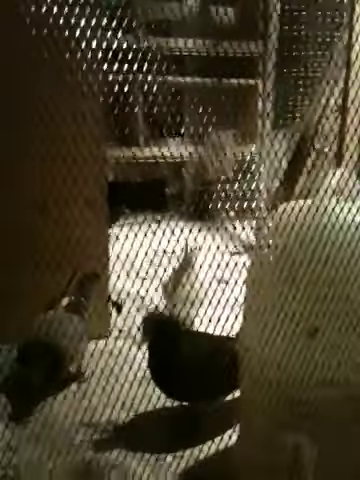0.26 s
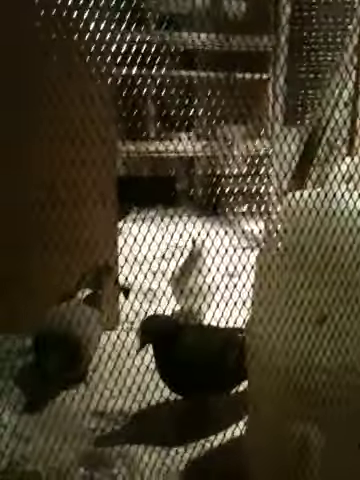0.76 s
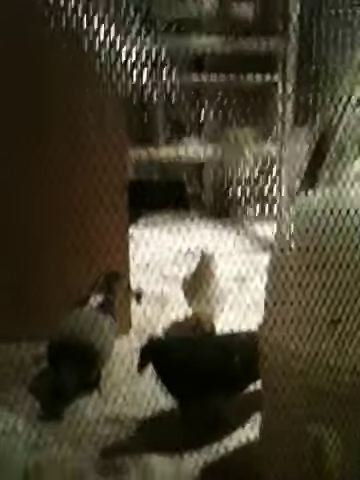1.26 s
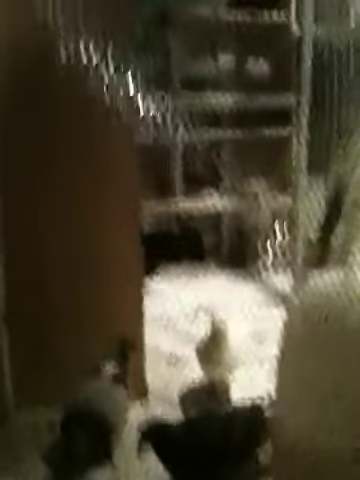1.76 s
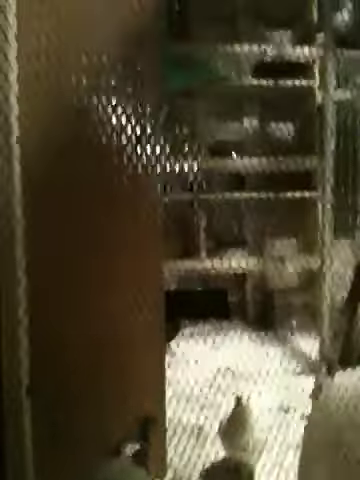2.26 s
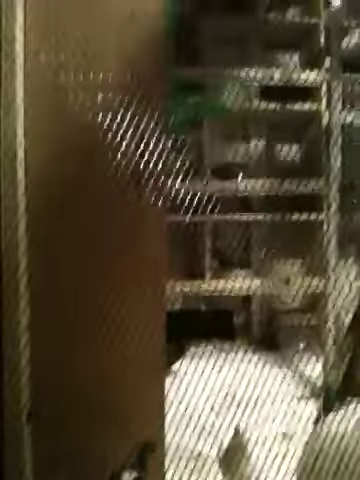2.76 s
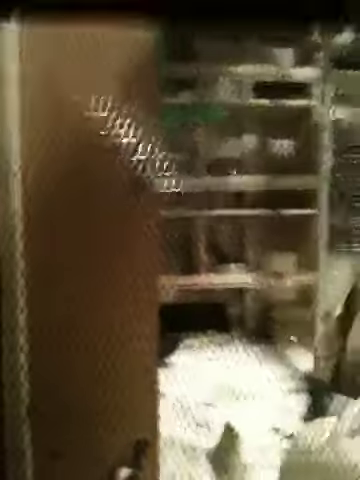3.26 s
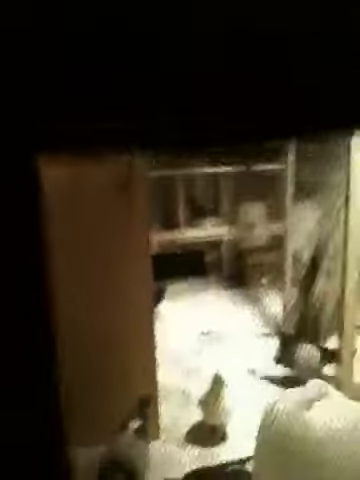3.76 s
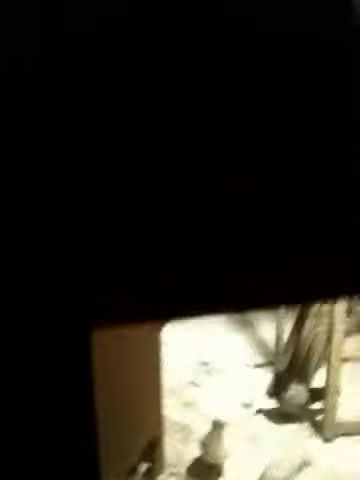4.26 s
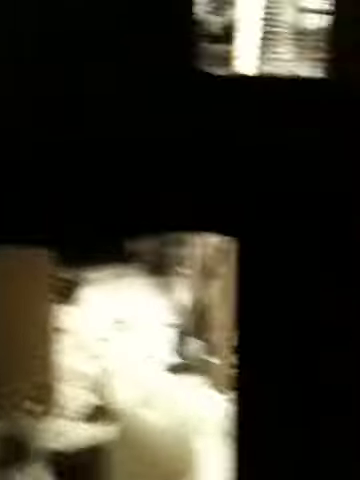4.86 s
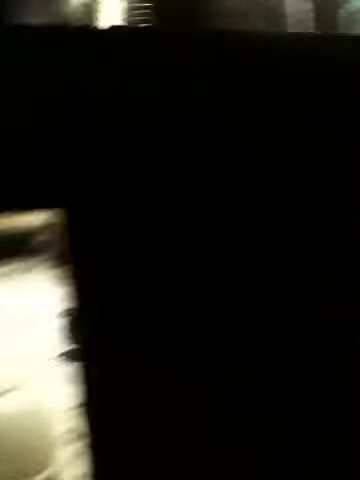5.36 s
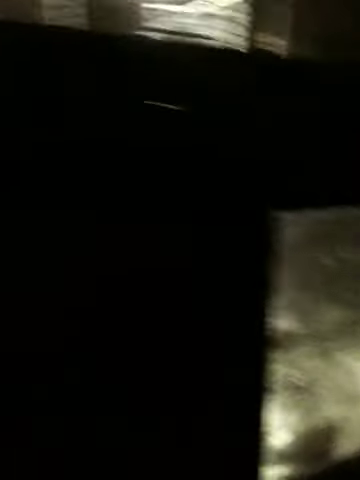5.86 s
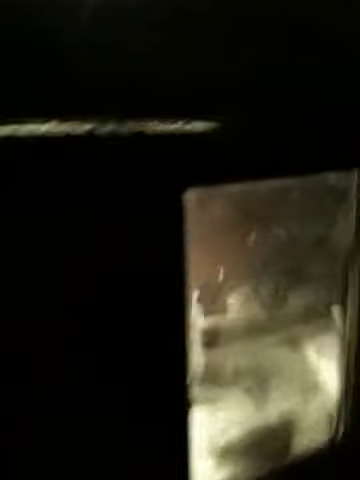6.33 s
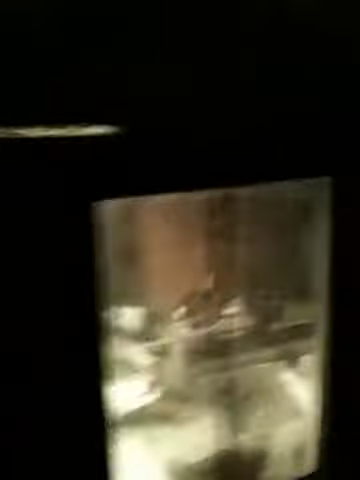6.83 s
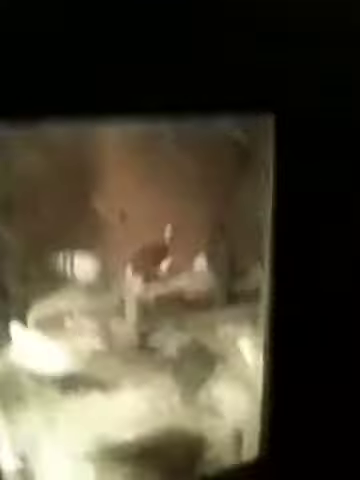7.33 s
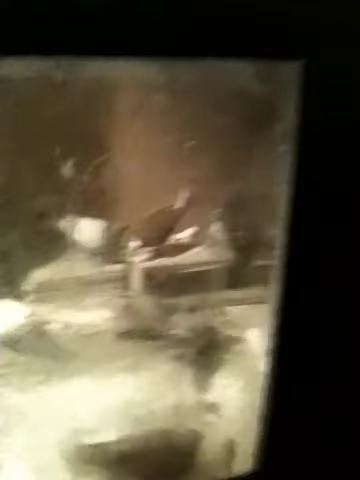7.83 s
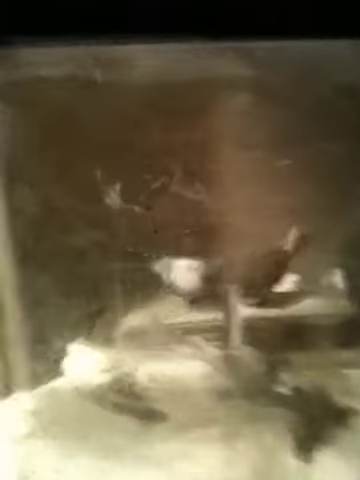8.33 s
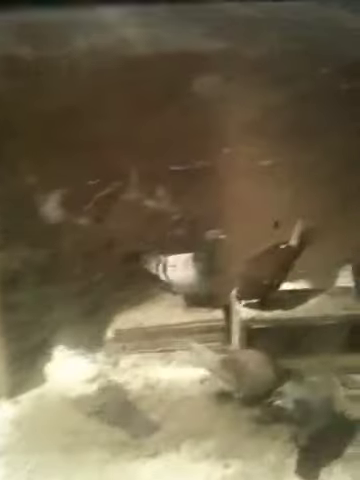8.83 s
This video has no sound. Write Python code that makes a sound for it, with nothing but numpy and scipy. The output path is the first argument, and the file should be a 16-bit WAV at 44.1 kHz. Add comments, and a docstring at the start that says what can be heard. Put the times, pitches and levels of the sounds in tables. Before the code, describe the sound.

Inside a small wooden loft, many pigeons coo in low, rolling, overlapping voices, with more birds murmuring behind. Faint hiss and light shuffling lie underneath. Around the middle a metal latch rattles and snaps shut loudly close by. Afterwards feathers and litter rustle more, claws tap on wood, and the coos become denser. A small handheld microphone gives a thin sound with little bass.

```python
"""Pigeons in a small wooden loft: from the start, noise bands hiss, blurred tones whistle thinly,
many short throbs blur into a murmur of far birds, and filtered noise shuffles like feathers and litter.
Soon gliding tones coo, short swelling tones throb, rustles burst and dry noise snaps tick.
Later, claws and beaks tap ringing boards, a metal latch ticks and snaps shut close by, and the
microphone case is softly bumped. The small microphone cuts the bass and the top."""
import sys
import numpy as np
from scipy import signal
from scipy.io import wavfile
from scipy.ndimage import uniform_filter1d

SR = 44100
rng = np.random.default_rng(int(sys.argv[2]) if len(sys.argv) > 2 else 0)


def transcribe(u):
    """Save the signal u as a 16-bit wav file named by the first command-line argument.

    u: samples, shape (n,) or (channels, n), limited to [-1, 1]; the rate is SR.
    q: integer samples, one column per channel.
    """
    v = np.clip(np.atleast_2d(u).T, -1, 1)
    q = np.round(v * 32767).astype(np.int16)
    wavfile.write(sys.argv[1], SR, q)


N = 400869  # samples, about 9.1 s

# rustles of feathers and litter: (start_s, level_db, dullness_db: tilt towards the lows)
RUSTLE_EVENTS = [(0.455, -72, 5.5), (0.652, -63.5, -3.5), (1.451, -77.5, -4.5), (2.858, -74.5, 13),
                 (3.013, -70, 6), (3.032, -79, 12), (3.396, -90.5, 26), (3.829, -58.5, -0.5),
                 (3.898, -68.5, 13), (5.383, -70, 4), (5.746, -73.5, -4.5), (5.794, -71, 4.5),
                 (6.086, -64, -0.5), (6.135, -63.5, -5.5), (6.181, -67.5, -8.5), (6.215, -65.5, 0.5),
                 (6.242, -66, -7), (6.553, -64.5, 0), (6.595, -74.5, -7), (6.69, -66.5, -6),
                 (6.732, -67.5, -4.5), (6.862, -78.5, 14), (6.909, -77, 8), (7.351, -57.5, -3.5),
                 (7.392, -70.5, 14), (7.42, -56, -2.5), (7.518, -62.5, -2), (7.546, -66.5, 3),
                 (7.609, -58.5, -1), (7.878, -62.5, 4), (8.1, -64, 3), (8.163, -64.5, 5),
                 (8.355, -63.5, 1.5), (8.62, -62, 7.5), (8.916, -61.5, 8.5), (8.947, -70.5, -1)]
# how rustles spread over pitch: (low_edge_hz, share of dullness [factor], level_db)
RUSTLE_COLOURS = [(123, 1, -6.5), (553, 1, -1), (1200, 0.85, -2), (2730, 0.56, -1.5), (4430, -0.88, 1),
                  (7240, -0.74, -5)]


def amp(db):
    """Turns decibels into a plain loudness factor."""
    return 10 ** (np.asarray(db) / 20)


def rms_one(x):
    """Scales a sound to an average strength (rms) of 1."""
    return x / np.sqrt(np.mean(x ** 2) + 1e-20)


def at_hz(points, hz):
    """Reads a curve of (hz, value) points, with pitch on a logarithmic scale as we hear it."""
    points = np.array(points)
    return np.interp(np.log(hz), np.log(points[:, 0]), points[:, 1])


def at_time(points):
    """Draws a curve of (time_s, value) points over the whole scene."""
    return np.interp(np.arange(N) / SR, *np.transpose(points))


def band(x, low_hz, high_hz):
    """Keeps mostly what lies between two pitches."""
    return signal.sosfilt(signal.butter(2, [low_hz, high_hz], "band", fs=SR, output="sos"), x)


def drift(rate_hz):
    """Wanders at random around 0 with spread 1: smoothed noise, made at every 40th sample."""
    r = np.exp(-80 * np.pi * rate_hz / SR)
    noise = rng.standard_normal(N // 40 + 2002)
    slow = signal.lfilter([1], [1, -2 * r, r * r], noise)[2000:]  # skip the filter's start
    return np.interp(np.arange(N) / 40, np.arange(len(slow)), rms_one(slow))


def add(out, start_s, sound):
    """Mixes a short sound in at its start time."""
    i = max(round(start_s * SR), 0)
    out[i:i + len(sound)] += sound[:max(N - i, 0)]


def click_train(events):
    """Silence with one single-sample click per event (start_s, level_db, ...)."""
    clicks = np.zeros(N)
    clicks[[round(s * SR) for s, *rest in events]] = amp(np.array(events)[:, 1])
    return clicks


def strike(clicks, modes, spread_db):
    """A struck body rings at its own pitches; each click rings each with a strength of its own."""
    out = 0
    for hz, db, t60 in modes:
        r = amp(-60 / (t60 * SR))  # loss per sample: 60 dB down after t60 seconds
        w = 2 * np.pi * hz / SR
        push = clicks * amp(db + spread_db * rng.standard_normal(N)) + 1e-18
        out = out + signal.lfilter([0, np.sin(w)], [1, -2 * r * np.cos(w), r * r], push)
    return out


def hiss(patchy_db):
    """Steady microphone hiss: third-octave bands of noise, each flickering a little."""
    # colour of the hiss: (pitch_hz, relative level per Hz [dB])
    hiss_colour = [(25, -44), (60, -15), (200, 4.5), (500, -2), (900, -10.5), (1650, -14.5), (7000, -20.5),
                   (15500, -24)]
    edges_hz = 25 * 2 ** np.arange(0, 9.5, 1 / 3)
    white = rng.standard_normal((2, N))  # neighbouring bands take different noise
    out = 0
    for k, (low, high) in enumerate(zip(edges_hz, edges_hz[1:])):
        level_db = at_hz(hiss_colour, np.sqrt(low * high)) + patchy_db * drift(6.6)
        out = out + amp(level_db) * band(white[k % 2], low, high)
    return rms_one(out)


def whistles():
    """Thin faint whistles: a gliding tone blurred by slow noise, fading in and out."""
    # (start_s, end_s, first_hz, last_hz, width_hz, level_db)
    whistle_notes = [(0, 9.09, 1998, 2010, 250, -80), (3.5, 3.58, 3990, 4020, 30, -75),
                     (3.57, 3.8, 4370, 4460, 45, -75), (3.68, 3.75, 4300, 3750, 40, -75),
                     (0.919, .95, 1156, 1280, 138.9, -68)]
    out = np.zeros(N)
    for start, end, first_hz, last_hz, width_hz, db in whistle_notes:
        size = round((end - start) * SR)
        turn = 2 * np.pi * np.cumsum(np.linspace(first_hz, last_hz, size)) / SR
        lowpass = signal.butter(2, width_hz / 2, fs=SR, output="sos")
        blur = signal.sosfilt(lowpass, rng.standard_normal((2, size)))
        tone = rms_one(blur[0] * np.sin(turn) + blur[1] * np.cos(turn))
        add(out, start, amp(db) * tone * signal.windows.tukey(size, .05))
    return out


def voice(hz, octave_db):
    """The closed beak and swollen throat pass the fundamental and some of its octave."""
    turn = 2 * np.pi * np.cumsum(hz) / SR + 2 * np.pi * rng.random()
    octave = np.sin(2 * turn + 2 * np.pi * rng.random())
    return np.sin(turn) + amp(octave_db) * octave


def throb(hz, octave_db, rise_s, fall_s):
    """One puff of air through the syrinx (voice organ): quick swell, quick fade, the pitch sagging."""
    t = np.arange(round(4 * fall_s * SR)) / SR
    shape = (1 - np.exp(-t / rise_s)) ** 2 * np.exp(-(t / fall_s) ** 2)
    sagging_hz = hz * (1.04 - 2.57 * np.minimum(t, .04))
    return shape / shape.max() * voice(sagging_hz, octave_db)


def murmur(count, spread_db):
    """Many far birds: rolls of three throbs, 18 to 38 a second, the later ones sliding lower."""
    # loudness of the murmur over time: (time_s, level_db)
    murmur_level = [(0.0, -68), (0.88, -51), (1.04, -52.5), (1.49, -71.5), (1.72, -72.5), (1.95, -56),
                    (2.3, -62), (3.72, -59), (4.3, -65), (4.93, -60), (6.02, -61), (6.33, -54),
                    (7.19, -62.5), (7.39, -52.5), (7.74, -53), (8.61, -55.5), (8.76, -52), (9.09, -54.5)]
    # loudness of throbs by pitch: (pitch_hz, relative level_db)
    murmur_colour = [(130, -31), (200, -2), (330, 3), (480, 1.5), (680, -6.5)]
    out = np.zeros(N)
    for when, pitch, loud, gap, size, slide in rng.random((count, 6)):
        hz = 130 * 5.2 ** pitch
        level = amp(at_hz(murmur_colour, hz) + spread_db * loud)
        for k in range(3):
            one = throb(hz * (1 - .08 * k * slide), -22, rise_s=.004, fall_s=.012 + .02 * size)
            add(out, when * N / SR + k * (.026 + .03 * gap), level * one)
    return amp(at_time(murmur_level)) * rms_one(out)


def patches(t, shape):
    """Hollow spots in boards and quills under claws and wings ring along, coloured like the rustle."""
    width_hz, patch_db = 142, -9
    dull_shares = [row[:2] for row in RUSTLE_COLOURS]
    out = np.zeros(N)
    for (s, db, dull_db), picks in zip(RUSTLE_EVENTS, rng.random((len(RUSTLE_EVENTS), 7))):
        for hz in 700 * 11 ** picks:  # seven narrow patches for each rustle
            ring = rms_one(band(rng.standard_normal(len(t)), hz, hz + width_hz))
            level = amp(db + dull_db * at_hz(dull_shares, hz) + patch_db)
            add(out, s + t[0], level * shape ** 0.44 * ring)
    return out


def rustles():
    """Bursts of friction over a thin bed of shuffling; each band of noise scratches on its own."""
    # bed of shuffling: (time_s, level_db)
    shuffle_points = [(0, -79.5), (1.6, -91.5), (3.4, -78.5), (3.6, -71.5), (4.001, -77.5), (4.4, -72),
                      (5.199, -80.5), (6.5, -72), (9.09, -76)]
    shuffle_db = at_time(shuffle_points)
    rise_s, fall_s = 0.008, 0.02
    grit = (rng.random(N) < 300 / SR) * rng.standard_normal(N) * 9.7  # single fibres snap
    t = np.arange(-.03, .12, 1 / SR)
    shape = np.where(t < 0, np.exp(-(t / rise_s) ** 2), np.exp(-t / fall_s))
    out = patches(t, shape)
    # every rustle gets its own random colour
    colours_db = 2.5 * rng.standard_normal((len(RUSTLE_EVENTS), len(RUSTLE_COLOURS)))
    for k, (low_hz, dull_share, band_db) in enumerate(RUSTLE_COLOURS):
        level = amp(shuffle_db + 1.5 * drift(10))
        for (s, db, dull_db), colour_db in zip(RUSTLE_EVENTS, colours_db[:, k]):
            add(level, s + t[0], amp(db + dull_share * dull_db + colour_db) * shape)
        scratch = rms_one(band(rng.standard_normal(N) + grit, low_hz, 1.96 * low_hz))
        out = out + level * amp(band_db + 2.5 * drift(68.4)) * scratch
    return out


def coos(tremble_db, waver, fade_s):
    """Held notes that glide or bend; level trembles and pitch wavers a little."""
    # simple coos: (start_s, length_s, first_hz, last_hz, level_db)
    held_notes = [(0.132, 0.26, 202, 166, -58), (0.556, 0.34, 299.5, 321.8, -51),
                  (0.744, 0.093, 356, 389, -47), (0.952, 0.15, 408.6, 359.4, -43.5),
                  (0.999, 0.22, 323, 307.7, -51.5), (1.208, 0.17, 232, 214, -59),
                  (1.808, 0.29, 348.7, 448.5, -62), (2.099, 0.27, 225.8, 233.7, -56),
                  (2.298, 0.18, 596, 591, -62.5), (2.798, 0.4, 218.3, 227.6, -55.5),
                  (3.031, .18, 232.2, 230.2, -55.5), (3.063, 0.13, 324, 342, -50),
                  (3.623, 0.083, 371, 369.5, -51.5), (3.729, 0.28, 229.3, 217.2, -54),
                  (3.758, 0.23, 461, 396, -57), (4.189, 0.06, 427, 407, -57),
                  (4.8, 0.36, 299.5, 231.3, -58.5), (4.945, 0.21, 327, 318, -56),
                  (5.084, 0.19, 455, 440, -58), (5.366, 0.085, 457, 417, -50), (5.457, 0.13, 620, 570, -59),
                  (6.549, 0.065, 418, 333, -47), (6.719, 0.17, 166.2, 193.8, -54.5),
                  (7.166, 0.1, 302, 294, -57.5), (7.542, 0.084, 464, 438, -50),
                  (7.591, 0.26, 361.6, 277, -49), (7.872, 0.16, 353, 339, -52),
                  (0.817, 0.114, 611, 609, -62.5), (8.14, 0.093, 546, 490, -52.5),
                  (8.201, 0.17, 377.8, 291.2, -46.5), (8.654, .05, 304, 299, -53),
                  (8.796, 0.046, 477, 494, -39.5), (8.873, 0.064, 395, 387, -43),
                  (8.974, 0.079, 316, 305, -51.5)]
    # longer coos whose pitch bends on the way, each a list of points: (time_s, pitch_hz, level_db)
    bent_notes = [
        [(5.43, 364.6, -53.5), (5.53, 308.6, -49), (5.575, 251, -54.5), (5.72, 242.4, -71)],
        [(2.33, 446, -59), (2.365, 405.6, -53.5), (2.41, 368.5, -58), (2.435, 338.7, -49.5),
         (2.5, 258.3, -47.5), (2.585, 249, -53.5), (2.64, 178, -63)],
        [(6.06, 444, -63), (6.1, 333, -51), (6.2, 290.7, -52), (6.33, 279, -58), (6.44, 241.4, -53)],
        [(8.7, 255, -49), (8.77, 185.5, -53), (8.84, 242, -49.5), (8.87, 250, -62)],
        [(8.695, 466, -44), (8.73, 497, -43), (8.755, 491, -46), (8.8, 587, -53), (8.85, 546, -61),
         (8.89, 503, -49)],
    ]
    # low voices show their octave: (pitch_hz, octave level_db)
    octave_levels = [(190, -9.5), (225, -1.5), (255, -16), (320, -41)]
    breath_loss_db_per_s = 2  # held notes fade as breath runs out
    glide_bend = 0.68  # under 1 the glide is faster at first
    tremble, wobble = amp(tremble_db * drift(42.0)), 1 + waver * drift(14.7)
    notes = []
    for start, length, first_hz, last_hz, db in held_notes:
        t = np.arange(round(length * SR)) / SR
        hz = first_hz * (last_hz / first_hz) ** ((t / length) ** glide_bend)
        notes.append((start, hz, db - breath_loss_db_per_s * t))
    for s, hz, db in map(np.transpose, bent_notes):
        t = np.arange(s[0], s[-1], 1 / SR)
        smooth_hz = uniform_filter1d(np.interp(t, s, hz), size=900, mode="nearest")
        notes.append((s[0], smooth_hz, np.interp(t, s, db)))
    out = np.zeros(N)
    for start, hz, db in notes:
        i = round(start * SR) + np.arange(len(hz))
        edges = np.clip(np.minimum(i - i[0], i[-1] - i) / SR / fade_s, 0, 1)
        soft_ends = np.sin(np.pi / 2 * edges) ** 2
        tone = voice(hz * wobble[i], at_hz(octave_levels, hz))
        out[i] += amp(db) * soft_ends * tremble[i] * tone
    return out


def throbs():
    """The throbs that stand out; each also sets the throat ringing."""
    # short throbs of a rolling coo: (start_s, level_db, pitch_hz)
    throb_notes = [(0.377, -46, 255), (0.465, -43, 314), (0.545, -46, 323), (0.574, -42, 370),
                   (0.642, -40.5, 304), (0.714, -45.5, 402), (0.799, -43, 359), (0.918, -41.5, 344),
                   (1.137, -37.5, 320), (2.119, -46.5, 289), (2.229, -36.5, 330), (2.759, -44, 299),
                   (2.853, -46, 295), (2.942, -45, 308), (3.014, -44, 329), (3.182, -45.5, 430),
                   (3.402, -42, 328), (3.518, -43.5, 442), (4.169, -54, 523), (4.29, -45, 315),
                   (4.507, -50.5, 313), (4.605, -47.5, 327), (4.955, -52, 607), (5.861, -45.5, 378),
                   (6.182, -50, 559), (6.3, -45.5, 386), (6.41, -44.5, 374), (6.48, -45.5, 280.6),
                   (6.7, -50.5, 610), (7.343, -40.5, 329), (8.156, -47, 286), (8.565, -41.5, 266),
                   (8.615, -34.5, 314), (8.718, -39, 376), (8.867, -37, 337), (8.943, -39, 303)]
    # how openly the throat rings: (time_s, level against the throb [dB])
    throat_points = [(0, -34), (1.5, -38), (2.1, -3), (2.9, -19.5), (3.4, -9.5), (6.5, -23.5), (8.1, -9),
                     (9.09, -19.5)]
    throat_hz = 609.6
    out = np.zeros(N)
    for s, db, hz in throb_notes:
        add(out, s - .003, amp(db) * throb(hz, -30, rise_s=.003, fall_s=.018))
        throat_db = db + np.interp(s, *np.transpose(throat_points))
        add(out, s, amp(throat_db) * throb(throat_hz, -41, rise_s=0.003, fall_s=0.016))
    return out


def loft(x, t60):
    """Dense echoes off wooden walls: noise that dies by 60 dB in t60 seconds."""
    t = np.arange(SR // 2) / SR
    echo = rng.standard_normal(len(t)) * amp(-60 * t / t60) * (t > .006)
    return signal.fftconvolve(x, echo / np.sqrt(np.sum(echo ** 2)))[:N]


def ticks():
    """Thin bright ticks: dry noise snaps a few milliseconds long, with no body."""
    # (start_s, level_db)
    tick_events = [(0.644, -43), (5.347, -45), (5.3692, -43), (5.6446, -48), (5.6564, -49), (1.222, -50),
                   (6.459, -44), (7.347, -42), (7.604, -39), (8.3474, -44), (9.0124, -43)]
    t = np.arange(round(.02 * SR)) / SR
    snap = rng.choice([-1, 1], len(t)) * amp(-60 * t / 0.015)
    return band(signal.fftconvolve(click_train(tick_events), snap)[:N], 1800, 7500)


def taps():
    """Claws and beaks on boards: each tap sets the wood ringing briefly."""
    # (start_s, level_db)
    tap_events = [(3.512, -53), (6.205, -53), (7.604, -48), (7.874, -56), (8.617, -49), (8.904, -59)]
    # pitches at which the boards ring: (pitch_hz, level_db, time to fall 60 dB [s])
    board_modes = [(597, 17, 0.008), (949, -9.5, 0.18), (1660, -10, 0.02)]
    return band(strike(click_train(tap_events), board_modes, spread_db=3.0), 310, 12000)


def latch():
    """Metal on metal: a hard crack, the short ring of the parts and a bright tail from the walls."""
    # contacts of the latch: (start_s, click level_db, brightness 0-1)
    contacts = [(4.4223, -31, .1), (4.4747, -25, .4), (4.4915, -29, .3), (4.6288, -24, .9), (4.636, -31, 1),
                (4.641, -26, .8), (4.6787, -24, 1), (4.704, -27, .4), (4.7137, -3, 1), (4.7168, -11, 1),
                (4.7206, -7, 1)]
    # pitches at which the metal rings: (pitch_hz, level_db, time to fall 60 dB [s])
    metal_modes = [(1828, -33, 0.092), (3420, -24, 0.035), (4110, -27, .04), (4930, -24, 0.021),
                   (5950, -17, 0.026), (7290, -18.5, .03), (8730, -20, 0.038), (9700, -21.5, .025),
                   (10300, -24, .03)]
    clicks = click_train(contacts)
    times_s, _, brightness = np.transpose(contacts)
    bright = clicks * np.interp(np.arange(N) / SR, times_s, np.clip(brightness, 0, 1))
    # powers above 1 weaken light touches more than hard blows
    middle = band(band(clicks ** 1.2, 2700, 9000), 2700, 9000)
    top = band(bright ** 1.25, 7500, 13000)
    thud = band(clicks ** 4.5, 300, 3000)  # only hard blows thud
    crack = amp(13.0) * (middle + top) + amp(10.0) * thud
    t = np.arange(SR // 3) / SR
    near_walls = amp(-19.5 - 60 * t / 0.08)
    whole_loft = amp(-43.0 - 60 * t / 0.47)
    wall_noise = rms_one(band(band(rng.standard_normal(len(t)), 1700, 11700), 500, 13400))
    walls = (near_walls + whole_loft) * wall_noise
    echoes = signal.fftconvolve(clicks ** 1.45, walls)[:N]  # light touches hardly reach the walls
    rings = 0
    for mode in metal_modes:
        source = bright if mode[0] > 7500 else clicks
        rings = rings + strike(source ** 1.25, [mode], spread_db=4)
    return crack + rings + echoes


def bumps():
    """Soft pushes on the case of the hand-held microphone: a low thud that dies quickly."""
    # (start_s, level_db)
    bump_events = [(7.35, -46), (7.6, -51)]
    t = np.arange(SR // 10) / SR
    thud = rms_one(band(rng.standard_normal(len(t)), 64, 300)) * amp(-60 * t / .15)
    return signal.fftconvolve(click_train(bump_events), thud)[:N]


def scene():
    """Mixes hiss, birds, rustles and knocks into one channel."""
    background = amp(-66) * hiss(patchy_db=1.5) + whistles()
    far_birds = murmur(count=400, spread_db=0.5)
    near_birds = coos(tremble_db=2.5, waver=0.012, fade_s=0.0081) + throbs()
    birds = far_birds + near_birds + amp(-6.0) * loft(near_birds, t60=0.15)
    knocks = ticks() + taps() + latch() + bumps()
    return (background + birds + rustles() + knocks)[None]


def record(dry):
    """The small capsule loses the deep bass; the top is cut."""
    thin = signal.sosfilt(signal.butter(2, 90, "high", fs=SR, output="sos"), dry)
    top_cut = signal.cheby2(14, 60, 16300, fs=SR, output="sos")  # 60 dB down from 16300 Hz up
    return signal.sosfilt(top_cut, thin)


dry = scene()
out = record(dry)
transcribe(out)
```